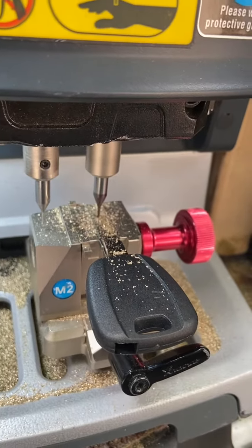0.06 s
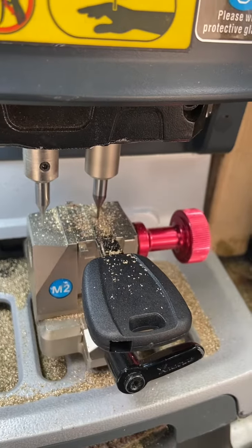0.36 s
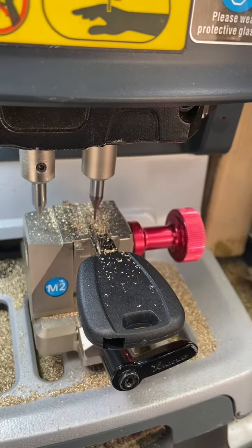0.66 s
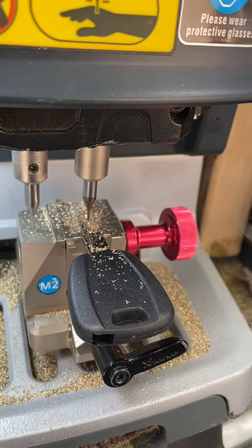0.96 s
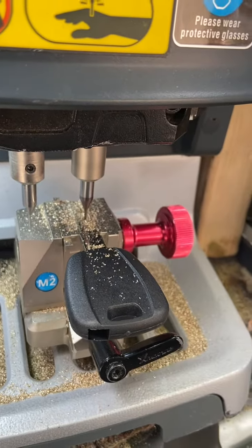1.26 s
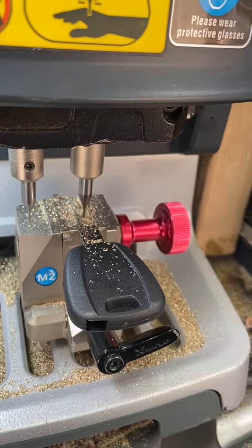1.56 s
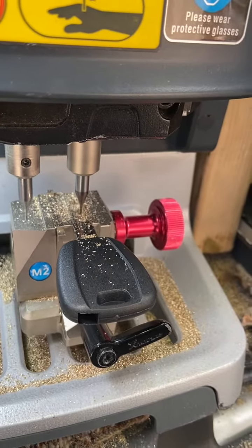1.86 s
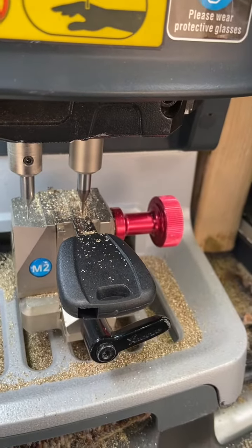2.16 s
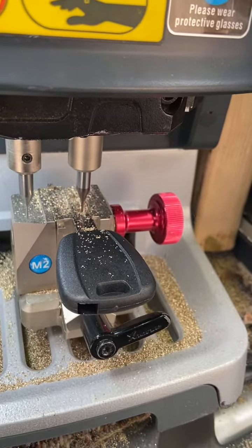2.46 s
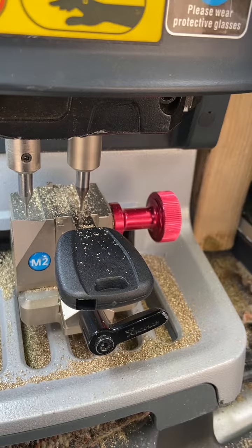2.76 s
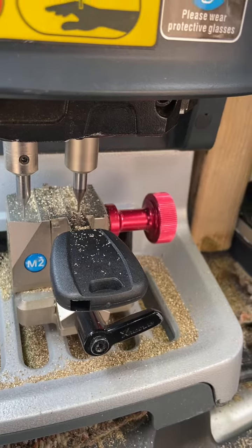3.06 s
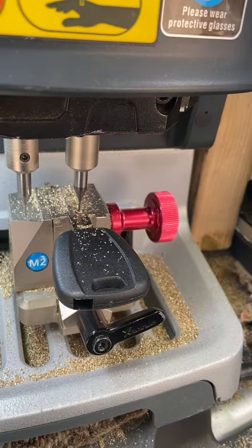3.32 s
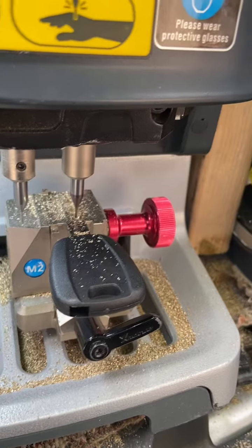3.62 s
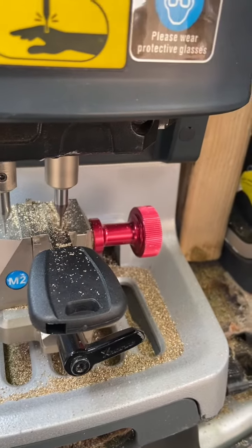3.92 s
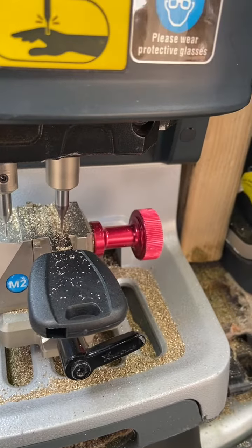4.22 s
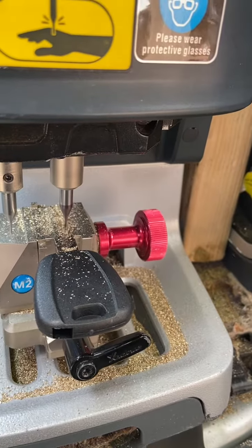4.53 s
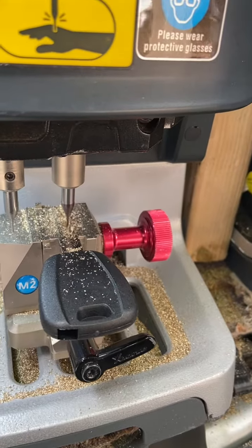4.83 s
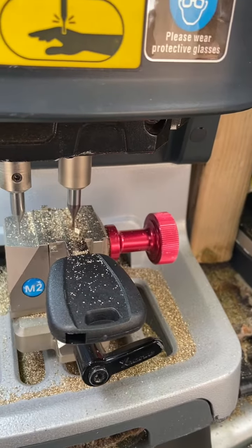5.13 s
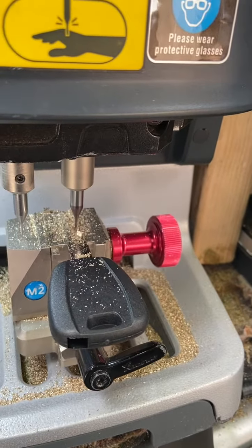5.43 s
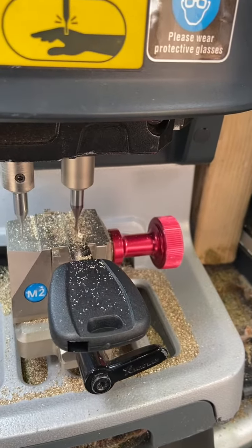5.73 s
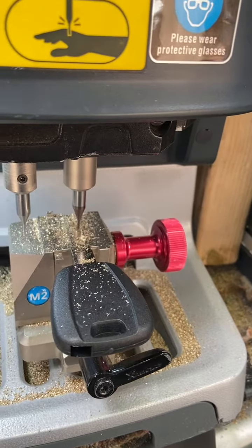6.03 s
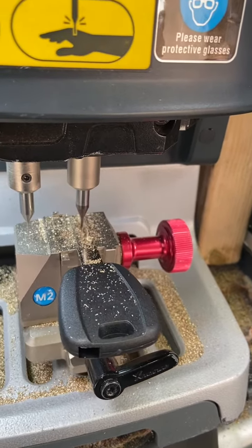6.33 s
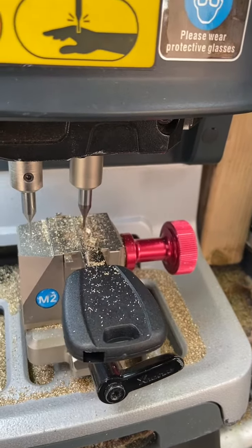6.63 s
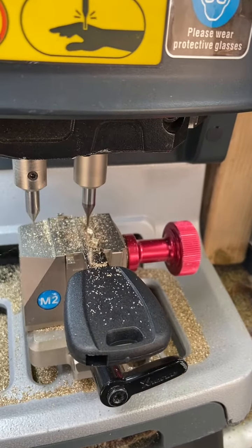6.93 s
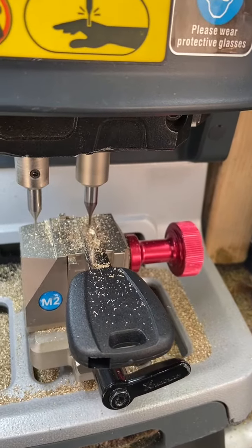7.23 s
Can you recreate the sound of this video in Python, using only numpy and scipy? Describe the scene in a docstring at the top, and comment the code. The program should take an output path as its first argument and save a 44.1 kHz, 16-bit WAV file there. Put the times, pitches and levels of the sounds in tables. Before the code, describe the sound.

A small key milling machine is cutting a brass blade from the very start, heard close up. The cutter makes a growling, rasping buzz with a fine hiss of chips. Its pitch holds steady, but its colour changes with each move of the feed, and it squeals briefly at about 1.5 and 2.6 seconds. From 2.6 to 3.6 seconds the carriage rumbles and judders as its motors speed up and slow down. The cut thins, catches harshly around 3.5 seconds, and the cutter briefly runs free and quieter. At about 3.8 seconds it scrapes back in and the buzz continues until the end, around 7.4 seconds, with short squeals near 4.4, 4.9, 6 and 6.5 seconds. Behind the cutting, feed motors hum at changing pitches, the spindle motor whines thinly, cooling air rushes and the bench drones low.

```python
"""First comes the growling buzz of a cutter in a brass blade: a small key milling machine on its bench,
close to a two-port microphone. The cutter bites once a turn, about 232 times a second, and the buzz
changes colour whenever the feed changes direction. It squeals in corners and throws hissing chips.
Halfway through, the carriage rumbles and the cutter briefly runs free. Behind it all the feed motors
hum, the spindle motor whines, cooling air rushes and the bench drones."""
import sys
import numpy as np
from scipy import signal
from scipy.fft import rfft, irfft, next_fast_len
from scipy.io import wavfile
from scipy.ndimage import map_coordinates

SR = 44100
rng = np.random.default_rng(int(sys.argv[2]) if len(sys.argv) > 2 else 0)


def inscribe(sig):
    """Save sig as 16-bit PCM at rate SR to the path in sys.argv[1].

    A 1-D sig is mono; a 2-D sig holds one channel per row.
    Samples are clipped to [-1, 1] before scaling.
    """
    pcm = np.round(np.clip(np.atleast_2d(sig).T, -1, 1) * 32767)
    wavfile.write(sys.argv[1], SR, pcm.astype(np.int16))


N = 325458
TIME = np.arange(N) / SR
SPINDLE_HZ = 231.87  # turns a second in the cut
REVERSAL_S = 0.016  # time the feed takes to change direction


def amp(db):
    """Decibels to gain."""
    return np.exp(np.asarray(db) * (np.log(10) / 20))


def unit(x):
    """Scaled to rms 1."""
    return x / np.sqrt(np.mean(x ** 2) + 1e-20)


def along(points, hz):
    """Read (frequency, value) points along a log frequency axis."""
    freqs, values = np.transpose(points)
    return np.interp(np.log(hz + 1), np.log(freqs + 1), values)


def wobble(rate):
    """A smooth random curve with `rate` knots a second."""
    hold = 16  # samples
    knots = rng.standard_normal(int(N * rate / SR) + 4)
    return np.repeat(map_coordinates(knots, [np.arange(0, N, hold) * rate / SR]), hold)[:N]


def swell(start, end, rise, fall):
    """An envelope in dB: 0 from start to end, 10 dB lower one rise before and one fall after."""
    return -10 * np.clip(np.maximum((start - TIME) / rise, (TIME - end) / fall), 0, 10)


def tone(cycles, flutter_db, drift, rate):
    """A sine of rms about 1 whose level and phase (drift, in radians) waver `rate` times a second."""
    phase = 2 * np.pi * (cycles - np.floor(cycles) + rng.random()) + drift * wobble(rate)
    return np.sqrt(2) * amp(flutter_db * wobble(rate)) * np.sin(phase.astype(np.float32))


def filtered(x, response):
    """Pass x through a complex frequency response."""
    size = next_fast_len(N + SR // 4)
    return irfft(rfft(x, size) * response(np.fft.rfftfreq(size, 1 / SR)), size)[..., :N]


# Noise that differs between the microphone's ports: (frequency [Hz], side relative to mid [dB])
SIDE_SHARE = [(100, -38), (300, -9.5), (600, -2), (1150, -3), (1450, 0.5), (1900, -6.5), (2500, -27),
              (3300, -4.5), (6000, -6), (7300, -68), (8700, -1.5), (10300, -55), (12000, -5), (13400, -50),
              (15100, -14)]
def spread(pair, response):
    """Two unrelated signals become one coloured, mostly shared stereo sound of rms 1."""
    mid_and_side = lambda hz: np.array([np.ones_like(hz), amp(along(SIDE_SHARE, hz))])
    mid, side = filtered(pair, lambda hz: response(hz) * mid_and_side(hz))
    return unit(np.array([mid + side, mid - side]))


def noise(spectrum, gate=1, likeness=0):
    """Gated, coloured stereo noise; likeness (0-1) from turn to turn gathers it at the spindle's orders."""
    comb = lambda hz: 1 / np.abs(1 - likeness * np.exp(2j * np.pi * hz / SPINDLE_HZ))
    return spread(gate * rng.standard_normal((2, N)), lambda hz: amp(along(spectrum, hz)) * comb(hz))


def resonant(modes):
    """Stereo noise ringing in a few resonances."""
    def body(hz):
        return sum(amp(db) * np.abs(hz * width / (centre ** 2 - hz ** 2 + 1j * hz * width)) ** 2
                   for centre, width, db in modes)
    return spread(rng.standard_normal((2, N)), body)


# Steady thin whines that follow the spindle speed, most of them from its motor: (order [multiple of spindle
# speed], level [dB])
MOTOR_WHINE = [(9.16, -56.5), (9.76, -54), (10.5, -62.5), (16.7, -59), (17.27, -54), (18, -58), (21, -51),
               (21.43, -57), (22.5, -58), (27.5, -62), (63.1, -64)]
# Cooling air, and the bench under the machine: (frequency [Hz], relative density [dB])
AIR_SPECTRUM = [(100, -10), (200, 7.5), (350, -12), (600, -0.5), (1500, -52), (1900, -3.5), (2800, -34),
                (4100, -39), (6000, -14), (11000, -28.5), (15800, -26)]
BENCH_SPECTRUM = [(20, -25), (35, -23), (50, 1.5), (72, 3), (100, -6.5), (130, -8), (250, -26), (600, -75)]
def motor(turns):
    """The bed of sound behind the cut: thin bearing whine, cooling air and the drone of the bench."""
    whine = sum(amp(db) * tone(k * turns, flutter_db=1.5, drift=0.25, rate=30) for k, db in MOTOR_WHINE)
    air = amp(-41) * noise(AIR_SPECTRUM)
    bench = amp(-43 - wobble(2.5)) * noise(BENCH_SPECTRUM)
    return whine + air + bench


# Feed motor tones, low under the cut: (start [s], end [s], frequency [Hz], level [dB])
FEED_TONES = [(0, 0.425, 205, -46), (0, .4, 1320, -45), (.42, 0.996, 51.7, -45), (1.116, 1.33, 65.6, -40.5),
              (1.053, 1.49, 289.6, -42.5), (1.543, 2.018, 202.5, -38), (1.55, 1.98, 1363, -38),
              (2.15, 2.65, 284.6, -38.5), (2.798, 2.875, 596, -29.5), (3.189, 3.254, 529.5, -34),
              (3.82, 4.292, 285.6, -38.5), (4.403, 4.86, 1340, -41), (4.4, 4.86, 2680, -52),
              (4.952, 5.418, 288, -41), (5.3, 5.95, 4300, -49), (5.313, 5.994, 221.7, -35),
              (5.99, 6.406, 214.5, -39), (6.01, 6.402, 1330, -42), (6.01, 6.402, 2690, -45),
              (5.984, 6.644, 79.8, -41), (6.85, 7.4, 214, -38.5), (7.164, 7.4, 286, -37.5)]
def feed_motors():
    """The feed motors hum at a new step rate for each move."""
    hum = np.zeros(N)
    for start, end, hz, db in FEED_TONES:
        running = np.clip(np.minimum(TIME - start, end - TIME) / 0.016, 0, 1)
        hum += amp(db) * running * tone(hz * TIME, flutter_db=1.5, drift=0.3, rate=12)
    return hum


# Step rates during the carriage's traverse, one list per feed motor: (time [s], rate [Hz])
STEP_RATES = [
    [(2.62, 279), (2.75, 306), (2.80, 202), (2.86, 279.4), (2.94, 190.7), (3.02, 288.3), (3.12, 272),
     (3.2, 297.3), (3.24, 269.5), (3.30, 169.3), (3.39, 160), (3.47, 293.7), (3.58, 264)],
    [(2.62, 193), (2.72, 157.7), (2.78, 227), (2.93, 153.3), (3.0, 231), (3.06, 162.5), (3.14, 146.8),
     (3.22, 213.5), (3.33, 281.9), (3.44, 235.4), (3.52, 160.3), (3.58, 181)],
]
def hunting_motors():
    """Two feed motors speed up and slow down along the contour, stepping roughly."""
    motors_db, harmonics_db, jitter = (-33, -34.5), (0.5, -13, -12), 0.02
    hum = np.zeros(N)
    for rates, db in zip(STEP_RATES, motors_db):
        step_hz = np.interp(TIME, *np.transpose(rates)) * (1 + jitter * wobble(90))
        steps = np.cumsum(step_hz) / SR
        for k, harmonic_db in enumerate(harmonics_db, 1):
            hum += amp(db + harmonic_db) * tone(k * steps, flutter_db=2, drift=0.3, rate=70)
    return hum


# Resonances of the carriage: (frequency [Hz], width [Hz], relative level [dB])
RUMBLE_MODES = [(142, 28, -5), (173, 40, -3), (208, 71, 4), (265, 31, 12)]
JUDDER_MODES = [(535, 42, -1), (580, 110, 1), (780, 280, -10.5), (984, 100, -2)]
# Its dense rattle: (frequency [Hz], relative density [dB])
RATTLE_SPECTRUM = [(30, -25), (60, 9), (110, -1), (160, -5), (270, 3.5), (345, -20), (520, -18), (800, -14),
                   (1100, -24), (1500, -30), (4000, -54)]
# Throbs as the motors pass through its resonance: (time [s], half length [s], lift [dB])
CARRIAGE_THROBS = [(3.0, 0.037, 5.5), (3.23, 0.056, 1), (3.467, 0.028, 6)]
def carriage():
    """The moving carriage rumbles and judders unevenly in its resonances as the cutter leaves the cut."""
    start_s, end_s, rise_s, stop_s = 2.62, 3.595, 0.047, 0.048
    moving = np.clip(np.minimum((TIME - start_s) / rise_s, (end_s - TIME) / stop_s), 0, 1)
    throb_db = sum(db * np.exp(-((TIME - at) / half) ** 2) for at, half, db in CARRIAGE_THROBS)
    jolts_db = throb_db - 1 + 1.5 * wobble(55)
    rumble = hunting_motors() + amp(-35.5) * resonant(RUMBLE_MODES) + amp(-40) * noise(RATTLE_SPECTRUM)
    step_up_db = 0.5 * np.clip(0.5 + (TIME - 2.7) / REVERSAL_S, 0, 1)
    judder_db = np.maximum(-27.5 - 26 * np.abs(TIME - 2.84), -42)  # peaks early, fades to a floor
    judder = amp(judder_db) * resonant(JUDDER_MODES)
    return moving * amp(jolts_db) * (amp(step_up_db) * rumble + judder)


# Heavy passes: (full load [s], let go [s], rise [s per 10 dB], release [s per 10 dB],
# relative level [dB], sag [dB/s])
HEAVY_PASSES = [(0, 0.442, .02, .03, -23, 0.5), (1.61, 2.023, .28, 0.17, -23.5, 2.5),
                (2.692, 2.757, 0.098, 0.25, -23, 11), (3.875, 4.278, 0.025, .04, -26, -3.5),
                (5.017, 5.382, 0.12, 0.015, -25, 9), (6.01, 6.025, 0.073, 0.022, -26.5, 0),
                (6.575, 7.026, 0.022, 0.034, -20.5, 11)]
def load_db():
    """The third order builds as a heavy pass begins and mostly sags as the brass gives way."""
    passes = [db + swell(full, end, rise, fall) - sag * np.clip(TIME - full, 0, end - full)
              for full, end, rise, fall, db, sag in HEAVY_PASSES]
    return np.max(passes, axis=0)


# Cutting force by kind of cut, each named for its sound: (relative level [dB] of orders 1 to 8)
CUT_FORCE = {"growl": (-34, -35.5, -34, -38.5, -43, -41.5, -49, -34.5),
             "buzz": (-25, -41.5, -36, -38.5, -40.5, -47, -50.5, -35.5),
             "drone": (-23.5, -39.5, -33, -30.5, -37.5, -49, -46, -29),
             "hum": (-24.5, -54, -39.5, -32.5, -38.5, -55, -63, -33),
             "squeal": (-26.5, -36, -31.5, -30, -34, -39, -48, -24),
             "scrape": (-36.5, -44.5, -32.5, -36.5, -34, -43.5, -40, -32),
             "judder": (-32.5, -26.5, -24, -30, -30.5, -58, -42, -36.5),
             "skim": (-29, -72, -64, -39, -46, -65, -49, -69),
             "free": (-29, -61, -44, -53, -69, -66, -54, -64)}
# Relative levels by kind of cut: (grinding [dB], rasp [dB], chip hiss [dB], ripple of order 8 [dB])
CUT_SWARF = {"growl": (-36, -38, -42.5, -1.5), "buzz": (-33.5, -40, -43, 2),
             "drone": (-33.5, -36.5, -42.5, 3), "hum": (-32.5, -34.5, -42.5, 6.5),
             "squeal": (-33, -36.5, -42.5, 0.8), "scrape": (-34.5, -31, -44, 3),
             "judder": (-27, -34, -44.5, 13), "skim": (-42, -43.5, -51.5, 19), "free": (-49, -50.5, -69, 1)}
# Colours of the edge's buzz, named for their sound: (relative level [dB] of orders 9 to 20)
EDGE_COLOURS = {"whining": (-45, -2, -23, -9, -5, -11, -2, -20.5, -23, -25, -17.5, -23),
                "nasal": (-13.5, -4, -9, -22, -8.5, -15.5, -4, -26, -10.5, -19, -10, -14),
                "hollow": (-9.5, -1, -18, -15, -6, -23, -7.5, -26, -11, -16, -20, -25),
                "bright": (-17, -16, -19, -28, -5.5, -32, -15, -12, -22, -22, -9, -25),
                "harsh": (-32, -10.5, -15, -9, -10.5, -8.5, -8.5, -16, -8, -32, -6.5, -23),
                "even": (-16, -6.5, -27, -16, -8.5, -9.5, -8.5, -35, -17, -11, -14, -25),
                "keen": (-33, -8.5, -6.5, -14, -7.5, -7, -4, -19, -10, -40, -10, -12),
                "reedy": (-8, -11, -11, -22, -9, -14, -10, -38, -13.5, -13, -26, -23)}
# Strokes of the feed, each lasting until the next, with relative levels: (start [s], kind of cut,
# edge colour, order 1 [dB], orders 2-7 [dB], order 8 [dB], buzz [dB], grinding [dB], rasp [dB],
# chip hiss [dB], chatter [dB])
FEED_STROKES = [(0, "growl", "keen", 1.5, -1.5, 2.5, -30, 3, 3, 1, -50),
                (.31, "growl", "nasal", 2.5, 1, 6, -33, 5, 3.5, -1, -55),
                (0.453, "buzz", "nasal", -2.5, 1.5, -2.5, -30, 0, 3.5, 2, -35),
                (.72, "buzz", "nasal", -1, 2, 1, -30, 0, 4.5, 2, -31.5),
                (.92, "buzz", "even", -1, 4.5, 0.5, -32, 1, 3.5, 0.5, -34.5),
                (1.08, "buzz", "even", -2, 0.5, 0, -28.5, 0.5, 1.5, 1.5, -33),
                (1.39, "buzz", "even", -3.5, -0.5, 0, -29.5, 1.5, 6, 2, -24.5),
                (1.49, "drone", "bright", -5.5, -2, 3, -28, -0.5, 6.5, 0.5, -31),
                (1.56, "growl", "keen", 0.5, -3, 7, -30, 3.5, 5, -1, -33),
                (1.91, "growl", "nasal", 3.5, 0, 10, -31.5, 3, 1.5, -3, -39),
                (1.98, "drone", "hollow", -7, -1, -11, -34, 4.5, -1.5, -0.5, -46),
                (2.02, "buzz", "hollow", -2.5, 4, 4, -34, -0.5, 3.5, -2, -50),
                (2.17, "buzz", "even", -2.5, 0.5, 3.5, -30, 0, 2.5, 0.5, -27.5),
                (2.52, "scrape", "even", 7.5, 1.5, 0.5, -26, 2, -1.5, 1, -26),
                (2.63, "drone", "keen", -3, 2.5, 5.5, -31.5, 5, 7, -2.5, -48),
                (2.71, "drone", "keen", -8, -1.5, -3, -32, 3.5, 6.5, -4.5, -48),
                (2.82, "judder", "harsh", 1, -6, -1.5, -33.5, -3.5, 3.5, -0.5, -41),
                (3.04, "buzz", "even", -1.5, 3, -18, -34.5, 4, 6.5, -1.5, -49),
                (3.14, "buzz", "harsh", -14, -4, 5.5, -33.5, 2, 6.5, -9, -57),
                (3.219, "skim", "even", -8, -8.5, 12, -47.5, -1, 2, 0.5, -59),
                (3.477, "scrape", "harsh", -25, -3.5, -3.5, -34, 2, -6, -3, -52),
                (3.584, "free", "even", -2.5, -6, 0, -56, 1, 6.5, -4, -72),
                (3.766, "scrape", "harsh", 4.5, -5, -5.5, -33, 1.5, -5.5, -2, -52),
                (3.86, "drone", "reedy", -2.5, -1.5, -9, -30, 0, -1, -0.5, -62),
                (4.16, "drone", "even", -1, 1, -12, -28, -1.5, 3, 1, -60),
                (4.289, "hum", "bright", -0.5, 1.5, -1.5, -26, -0.5, 1.5, 1, -47),
                (4.4, "squeal", "whining", -2, -2.5, 2, -31.5, -0.5, 3, -2.5, -40),
                (4.821, "scrape", "keen", 8, -1.5, -10, -36, 0.5, -5, 0, -56),
                (4.87, "scrape", "harsh", 6.5, 1.5, 0, -30.5, 2, 1.5, -0.5, -56),
                (4.95, "drone", "reedy", -2, -1, -6, -30, 0, 0.5, 0, -60),
                (5.418, "hum", "even", 1, 0.5, -0.5, -31, -1.5, -1.5, 0, -50),
                (5.95, "hum", "nasal", 0.5, 2, 1, -28.5, 1, 0, 0.5, -52),
                (6.02, "squeal", "whining", -1.5, -2.5, 2, -32.5, 0, -1.5, -0.5, -46),
                (6.387, "scrape", "keen", 8.5, -2, -3.5, -34.5, 2.5, -1, -1, -55),
                (6.43, "scrape", "harsh", 7.5, -5, 6.5, -36, -4, -2.5, -0.5, -56),
                (6.495, "scrape", "harsh", 2, 1.5, 5.5, -32.5, 0.5, -0.5, 2, -56),
                (6.565, "drone", "keen", -10, 3.5, -3, -37, 5, 5, 4, -60),
                (6.611, "drone", "nasal", -4.5, 1, 2, -31, -1.5, -2, -0.5, -56),
                (6.85, "drone", "reedy", -3.5, 0, -0.5, -30, 1, 1.5, 0, -58),
                (7.025, "hum", "whining", 0, 0.5, -7, -32, -0.5, 1, 0.5, -60),
                (7.16, "squeal", "whining", 1.5, -5, -0.5, -33, 0, 1.5, -0.5, -34)]
def cutting_levels():
    """Curves in dB for all that the cut drives; force and edge colour follow a new stroke more slowly."""
    trims = stroke_by_stroke([row[3:] for row in FEED_STROKES], REVERSAL_S)
    first_trim, middle_trim, eighth_trim, buzz, grind_trim, rasp_trim, chip_trim, chatter = trims
    kinds = [row[1] for row in FEED_STROKES]
    first, *middle, eighth = stroke_by_stroke([CUT_FORCE[kind] for kind in kinds], blend_s=0.028)
    grind, rasp, chip, ripple = stroke_by_stroke([CUT_SWARF[kind] for kind in kinds], REVERSAL_S)
    edge = stroke_by_stroke([EDGE_COLOURS[row[2]] for row in FEED_STROKES], blend_s=0.059)
    # Orders 2 to 7 shift briefly, most of them upward, when the kind of cut changes.
    flare_s, flare_db = 0.022, (0, 5, 2, 4, 3, -1)
    changes = [new[0] for old, new in zip(FEED_STROKES, FEED_STROKES[1:]) if new[1] != old[1]]
    flare = sum(np.clip(1 - np.abs(TIME - at) / flare_s, 0, 1) for at in changes)
    second, third, *higher = [db + middle_trim + lift * flare for db, lift in zip(middle, flare_db)]
    return dict(first=first + first_trim, middle=[second, np.maximum(third, load_db()), *higher],
                eighth=eighth + eighth_trim, ripple=ripple, edge=edge, buzz=buzz, chatter=chatter,
                grind=grind + grind_trim, rasp=rasp + rasp_trim, chip=chip + chip_trim)


def stroke_by_stroke(rows, blend_s):
    """Hold each row through its stroke and blend it into the next: one curve per column."""
    hold = 32  # samples
    rows = np.array(rows, float)
    starts = np.array([[row[0]] for row in FEED_STROKES[1:]])
    entered = np.clip(0.5 + (TIME[::hold] - starts) / blend_s, 0, 1)
    curves = rows[0][:, None] + np.diff(rows, axis=0).T @ entered
    return np.repeat(curves, hold, axis=1)[:, :N]


def spindle(cut):
    """Turns made so far; the speed wanders slightly and rises a little as the load falls away."""
    unloaded = np.clip((-37 - cut["grind"]) / 10, 0, 1)
    speed_hz = SPINDLE_HZ + 0.7945 * unloaded + 0.1398 * wobble(5) + 0.095 * wobble(20)
    return np.cumsum(speed_hz) / SR


def bites(turns, sharpness, scatter_db):
    """One pulse a turn, each of its own size."""
    sizes = amp(scatter_db * rng.standard_normal(int(turns[-1]) + 2))
    return sizes[turns.astype(int)] * np.exp(-sharpness * (1 + np.cos(2 * np.pi * turns)))


# The cutter catches an edge of the blade: (time [s], level [dB], time to fall 60 dB [s])
EDGE_CATCHES = [(3.497, -27.5, 0.16), (3.549, -28, 0.08), (3.772, -28, 0.2), (3.79, -29, 0.08)]
# Colour of that scrape: (frequency [Hz], relative density [dB])
CATCH_SPECTRUM = [(150, -4), (700, -2), (1200, -1), (1500, -13), (2000, -6), (2800, -7), (4200, -3),
                  (6000, -18), (14000, -20)]
def catches(turns):
    """Short harsh bursts where the edge first meets the brass."""
    dig_in_s = 0.005  # about one turn
    bursts = sum(np.clip(1 + (TIME - at) / dig_in_s, 0, 1) * amp(db - 60 * np.abs(TIME - at) / t60)
                 for at, db, t60 in EDGE_CATCHES)
    return bursts * noise(CATCH_SPECTRUM, 0.46 + bites(turns, sharpness=1.08, scatter_db=1.5))


# Brass being torn away, heard close up: (frequency [Hz], relative density [dB])
GRIND_SPECTRUM = [(110, -10), (190, 6), (270, 0), (350, -7.5), (580, 7), (810, 1), (1050, 5.5), (1280, 3),
                  (1520, -1.5), (1740, -1.5), (1950, 8), (2220, -2), (2430, 0.5), (2700, -1.5), (3200, -7),
                  (6000, -24)]
RASP_SPECTRUM = [(1500, -27), (2600, -3.5), (3150, -0.5), (3600, -1), (4050, 3.5), (4550, -4), (5200, -6.5),
                 (5700, -8), (6300, -4), (9000, -16.5)]
CHIP_SPECTRUM = [(2500, -16), (4000, 1), (5400, 2), (6400, 11), (7400, -3), (8400, 2), (10200, 5),
                 (11300, 11), (12400, -3), (13600, 5.5), (15800, -5.5)]
def swarf(turns, cut):
    """Each bite grinds, rasps, ticks and tears off a hissing chip."""
    grind = amp(cut["grind"] + 1.3 + 0.9 * wobble(18)) * noise(
        GRIND_SPECTRUM, 0.45 + bites(turns, sharpness=1.4, scatter_db=3), likeness=0.34)
    rasp = amp(cut["rasp"] - 1.5 + 0.9 * wobble(23)) * noise(
        RASP_SPECTRUM, 1.3 + bites(turns + 0.4, sharpness=0.6, scatter_db=3.5), likeness=0.44)
    hiss = amp(cut["chip"] + 3.5 + 1.23 * wobble(21)) * noise(
        CHIP_SPECTRUM, 0.69 + bites(turns + 0.5, sharpness=0.65, scatter_db=2), likeness=0.36)
    strikes = np.diff(np.floor(turns), prepend=0) * amp(1.82 * rng.standard_normal(N))
    ring_time, ring_t60_s = TIME[:SR // 80], 0.0097
    shank_ring = rng.standard_normal(len(ring_time)) * amp(-60 * ring_time / ring_t60_s)
    chip_treble = lambda hz: amp(along(CHIP_SPECTRUM, hz)) * hz ** 4 / (hz ** 4 + 6000 ** 4)
    ticks = unit(filtered(signal.fftconvolve(strikes, shank_ring)[:N], chip_treble))
    return grind + rasp + hiss + amp(cut["chip"] - 4.5) * ticks


# Ringing of the clamp that holds the blade: (frequency [Hz], width [Hz], relative level [dB])
CLAMP_MODES = [(1892, 150, 0)]
def clamp(turns, cut):
    """The cutting force swings the clamp at the low orders and squeals at the eighth, where it rings."""
    ripple_hz = 15  # the load on the edge rises and falls with the feed
    depth_db = cut["ripple"] * (0.92 + 0.2 * wobble(9))
    ripple_db = depth_db * np.sin(2 * np.pi * ripple_hz * TIME + 2.8 * wobble(3.7))
    low = amp(cut["first"] + 1 + 0.19 * wobble(18)) * tone(turns, flutter_db=-0.8, drift=0.026, rate=100)
    middle = sum(amp(db - 0.94 + 0.8 * wobble(7)) * tone(k * turns, flutter_db=0.8, drift=0.05, rate=40)
                 for k, db in enumerate(cut["middle"], 2))
    eighth = tone(8 * turns, flutter_db=0.6, drift=0.05, rate=40)
    squeal = amp(cut["eighth"] - 0.6 + ripple_db + 0.4 * wobble(6)) * eighth
    ring = amp(cut["grind"] - 12) * resonant(CLAMP_MODES)
    return low + middle + squeal + ring


# Squeals in corners: (time [s], rise [s per 10 dB], fall [s per 10 dB], level [dB], leading order)
CORNER_SQUEALS = [(.40, .04, .04, -41, 20), (1.50, .13, .05, -28.7, 15), (2.0, .03, .05, -41, 20),
                  (2.64, .13, .08, -32, 17), (2.88, .06, .1, -35, 19), (4.40, .06, .025, -34, 15),
                  (4.895, .04, .05, -33, 17), (5.98, .06, .03, -38, 13), (6.425, .02, .025, -33.5, 19),
                  (6.46, .025, .02, -32, 17), (6.51, .015, .04, -33.5, 17), (6.57, .025, .03, -38, 14),
                  (7.01, .04, .03, -41, 18)]
# Orders that ring along: (order, level relative to the leading one [dB])
SQUEAL_ORDERS = [(13, -7), (14, -9), (15, -5), (16, -9), (17, -3), (18, -9), (19, -7), (20, -13)]
def squeals():
    """The cutter bites deeper in a corner and squeals: the gain of each ringing order over time."""
    swells = [(amp(db + swell(at, at, rise, fall)), lead) for at, rise, fall, db, lead in CORNER_SQUEALS]
    return {k: sum(size * (1 if k == lead else amp(db)) for size, lead in swells)
            for k, db in SQUEAL_ORDERS}


# Faint top of the buzz, alike in all colours: (order, relative level [dB])
BUZZ_OVERTONES = [(21, -16), (22, -20), (23, -21), (24, -22), (25, -27), (26, -25), (27, -19.5)]
# Chatter between the whole orders: (order [multiple of spindle speed], relative level [dB])
CHATTER_TONES = [(2.6, -14.5), (3.5, -14.5), (4.5, -9), (5.5, -6.5), (9.5, -10.5)]
def cutter(turns, cut):
    """Up front, the edge strikes the brass once a turn; it chatters when every other bite is deeper."""
    ringing, strength = squeals(), amp(cut["buzz"] - 2.5)
    buzz = np.zeros(N)
    for k, db in list(enumerate(cut["edge"], start=9)) + BUZZ_OVERTONES:
        size = np.hypot(strength * amp(db), ringing.get(k, 0))  # buzz and squeal add in power
        buzz += size * amp(0.9 * wobble(6)) * tone(k * turns, flutter_db=0.9, drift=0.25, rate=46)
    chatter = sum(amp(db) * tone(k * turns, flutter_db=0.8, drift=0.28, rate=21)
                  for k, db in CHATTER_TONES)
    return buzz + amp(cut["chatter"] - 3.5) * chatter


def scene():
    """The machine at close range: the cut follows spindle and feed, over the carriage and the motors."""
    cut = cutting_levels()
    turns = spindle(cut)
    milling = clamp(turns, cut) + cutter(turns, cut) + swarf(turns, cut) + catches(turns)
    return milling + feed_motors() + carriage() + motor(turns)


# Phase between the microphone's two ports: (frequency [Hz], lead of the left [rad])
PORT_PHASE = [(200, 0), (1150, 0), (1500, -.7), (2280, .1), (2520, 2.2), (2850, 1.9), (3200, .4),
              (5500, .4), (6300, 2.1), (6850, 3.0), (7300, 3.14), (7900, 3.2), (8700, 4.2), (9700, 6.2),
              (11200, 6.5), (12500, 9), (13100, 9.35), (13800, 9.5), (14800, 10.3), (15400, 12.2)]
# Balance of the ports: (frequency [Hz], left minus right [dB])
PORT_BALANCE = [(110, 0), (260, -.6), (460, 3.4), (930, 2.2), (1160, -.7), (1600, -1), (2080, -2),
                (2500, -5), (2800, -1.5), (3020, -2), (3250, 1.5), (3850, 3), (4180, -2.5), (4450, .3),
                (5200, -.6), (7000, 0)]
def record(dry):
    """Close to the machine, the microphone's two ports hear it with different phase and level."""
    band_limit_hz = 15800
    left = lambda hz: np.exp(0.5j * along(PORT_PHASE, hz)) * amp(along(PORT_BALANCE, hz) / 2)
    return filtered(dry, lambda hz: np.array([left(hz), 1 / left(hz)]) * (hz < band_limit_hz))


dry = scene()
out = record(dry)
inscribe(out)
```